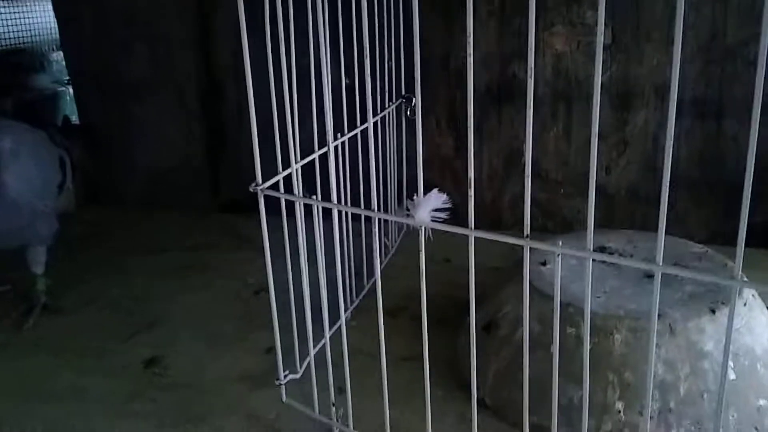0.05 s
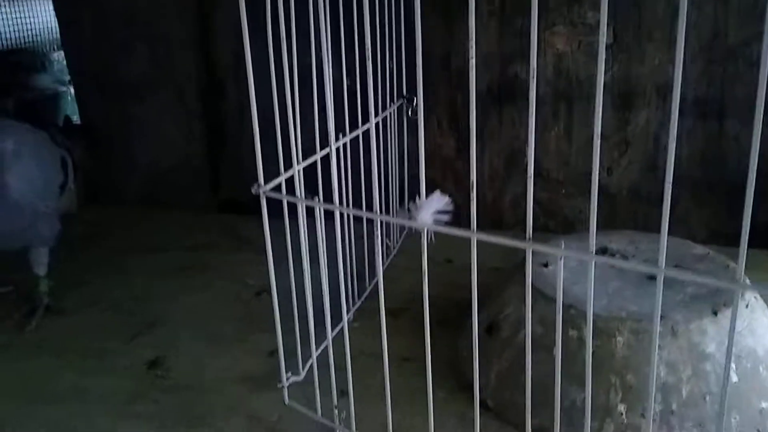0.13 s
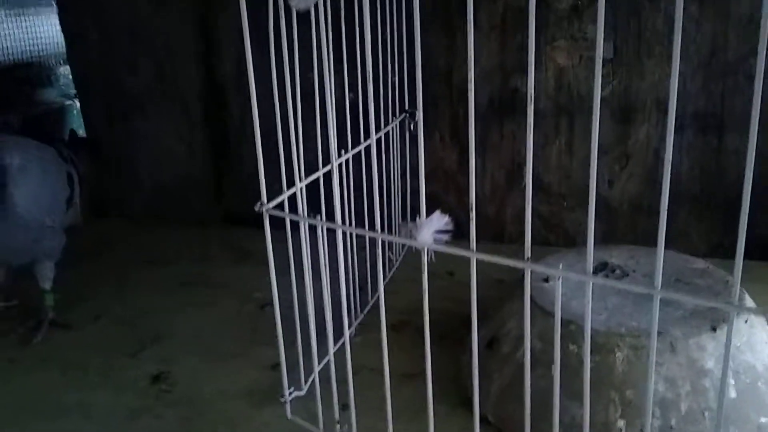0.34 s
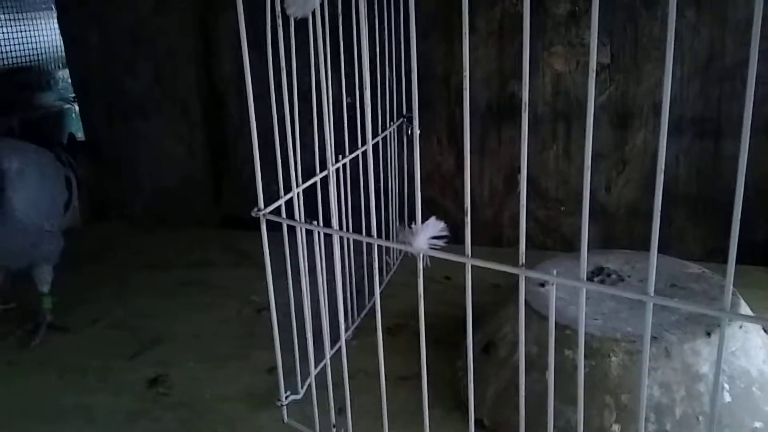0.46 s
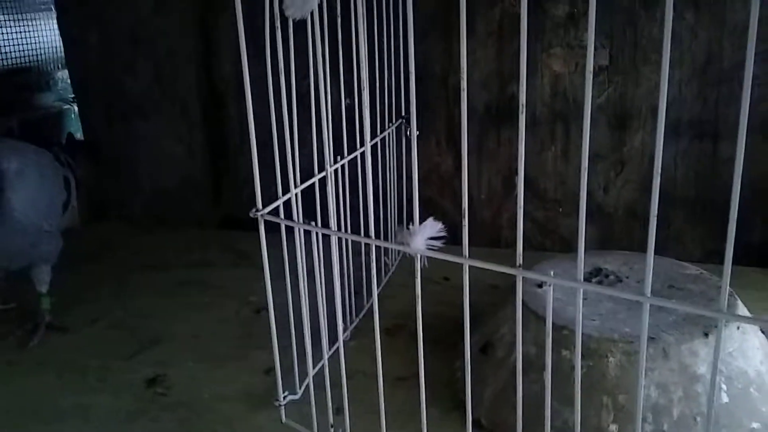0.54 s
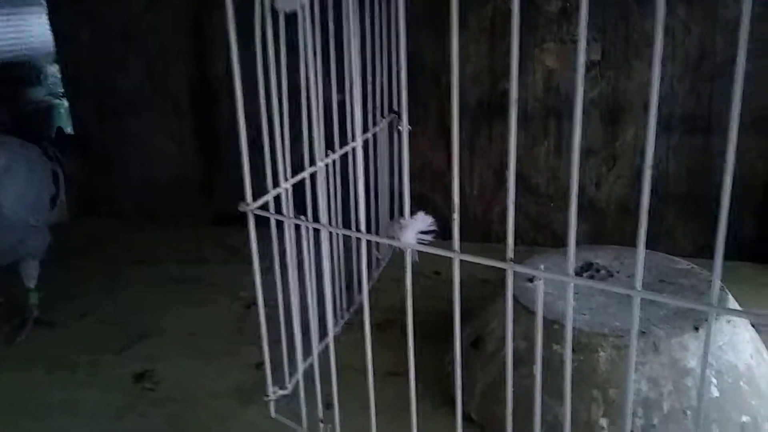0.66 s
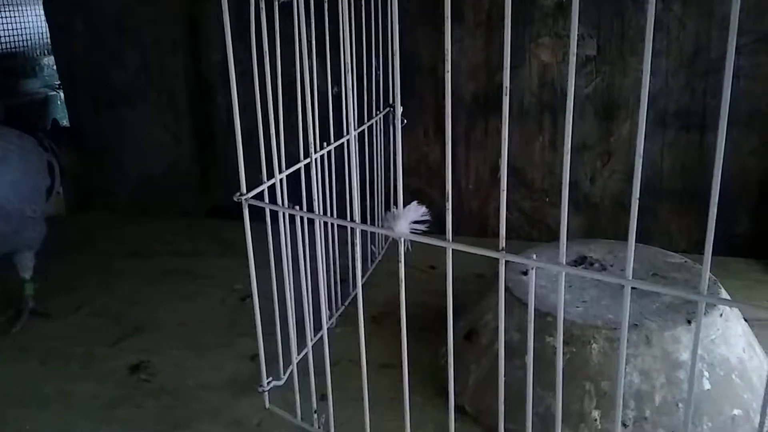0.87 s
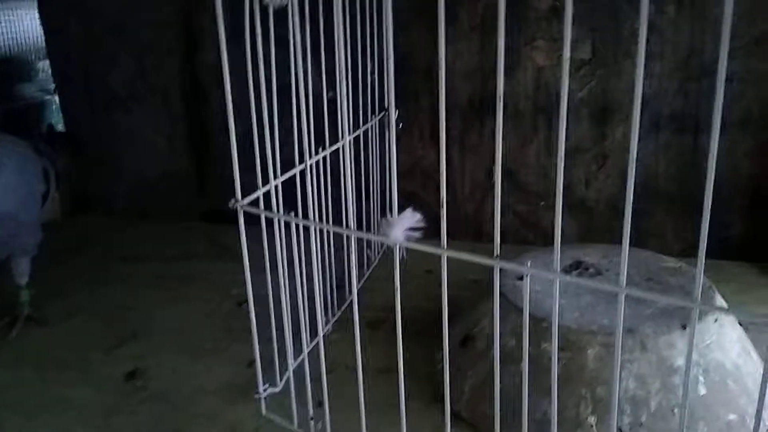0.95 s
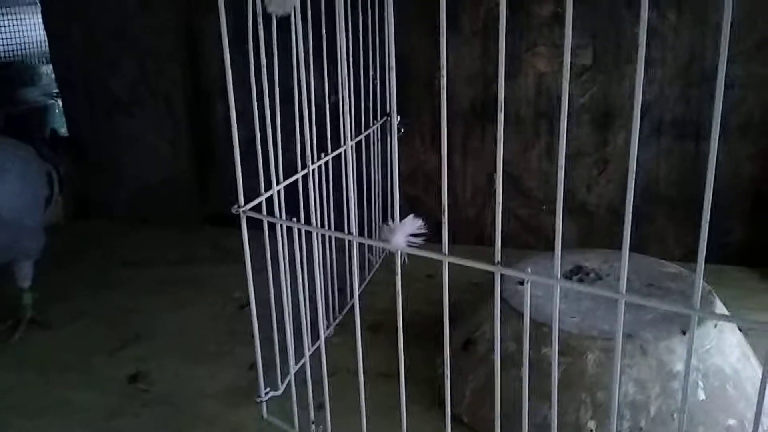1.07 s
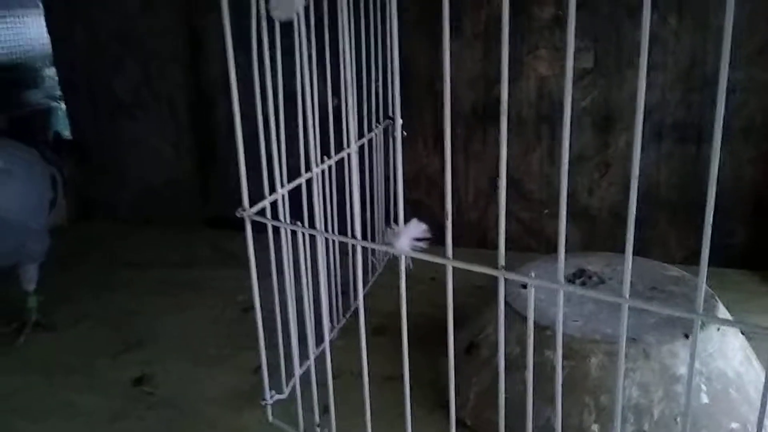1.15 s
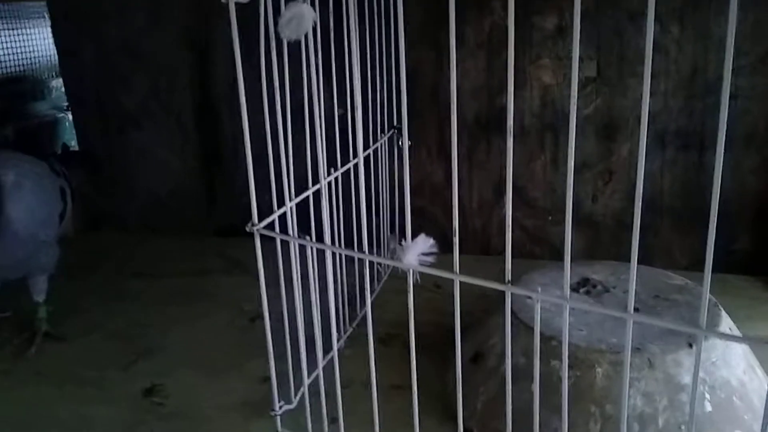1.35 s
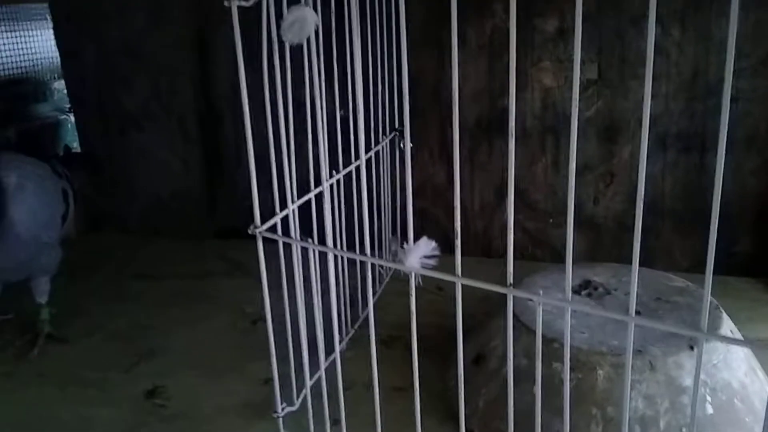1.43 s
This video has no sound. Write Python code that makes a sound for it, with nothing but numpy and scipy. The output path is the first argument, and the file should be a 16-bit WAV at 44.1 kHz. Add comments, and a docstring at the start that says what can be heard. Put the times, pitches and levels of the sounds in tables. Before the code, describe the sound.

One low, rolling pigeon coo sounds near the microphone inside a hollow wooden loft, swelling and then dropping away. A soft rush of wings follows, with light feather rustle, far birds murmuring and a faint rumble underneath.

```python
"""A pigeon coos low and rolling in a wooden loft: short lead-in, long swelling note, short tail note.
Its voice is a pulse train under a moving throat resonance, plus hoarse air; the loft's hollow boxes
ring at fixed low pitches. Feathers rustle and wings sweep nearby over a murmur of far birds and a rumble.
Above the bass, the two channels hear the room with opposite polarity and a small delay, combing their sum."""
import sys
import numpy as np
from scipy import signal
from scipy.fft import rfft, irfft, next_fast_len
from scipy.io import wavfile
from scipy.ndimage import uniform_filter1d, map_coordinates

SR = 44100
rng = np.random.default_rng(int(sys.argv[2]) if len(sys.argv) > 2 else 0)


def transcribe(signal):
    """Save signal, clipped to [-1, 1], as a 16-bit WAV file at the path in sys.argv[1]."""
    frames = np.atleast_2d(signal).T
    limited = np.clip(frames, -1, 1)
    pcm = np.round(limited * 32767).astype(np.int16)
    wavfile.write(sys.argv[1], SR, pcm)


N = 66150


def amp(db):
    return 10 ** (np.asarray(db) / 20)


def unit_rms(x):
    return x / np.sqrt(np.mean(x ** 2) + 1e-20)


def log_interp(points, hz):
    """(Hz, value) points read on a log axis."""
    knots_hz, values = np.transpose(points)
    return np.interp(np.log(hz + 1), np.log(knots_hz + 1), values)


def curves(rows):
    """Per-sample curve for each column after time."""
    times_s, *columns = np.transpose(rows)
    return [np.interp(np.arange(N) / SR, times_s, column) for column in columns]


def wobble(rate_hz):
    """Smooth random curve, rate_hz knots per second."""
    knots = rng.standard_normal(int(N * rate_hz / SR) + 4)
    return map_coordinates(knots, [np.arange(N) * rate_hz / SR])


def filtered(x, response):
    """Apply a complex frequency response."""
    size = next_fast_len(N + SR // 2)
    return irfft(rfft(x, size) * response(np.fft.rfftfreq(size, 1 / SR)), size)[..., :N]


# Bass phase between channels (frequency [Hz], phase [rad])
BASS_PHASE = [(20, -2.1), (120, -1.9), (200, -1.6), (300, -.8), (700, -1.1), (950, -.7)]
# Side signal tied to mid (frequency [Hz], share [0-1])
COHERENCE = [(30, .97), (130, .9), (220, .4), (700, .2), (1300, .45), (14000, .45)]
# Uncorrelated room noise (frequency [Hz], gain [dB])
DIFFUSE_SPECTRUM = [(100, -18), (200, -5), (700, -10), (1100, -30), (2000, -38), (2700, -36), (3300, -18),
                    (4500, -13), (7000, -3), (10000, -1), (12000, -6), (13500, -9)]
COMB_SPACING_HZ, COMB_FROM_HZ = 2240, 1130


def room_noise(spectrum, patchy_db):
    """Patchy stereo noise, rms 1, phase-shifted between the channels."""
    spectra = signal.stft(rng.standard_normal((4, N)), nperseg=512)[2]
    patches = rng.standard_normal(spectra.shape[1:])
    patches = uniform_filter1d(uniform_filter1d(patches, 6, axis=0), 10, axis=1)
    noise = signal.istft(spectra * amp(patchy_db * unit_rms(patches)), nperseg=512)[1][:, :N]

    def half_phase(hz):
        bass = log_interp(BASS_PHASE + [(COMB_FROM_HZ, 0)], hz)
        comb = 2 * np.pi * (COMB_FROM_HZ - hz) / COMB_SPACING_HZ
        return np.where(hz < COMB_FROM_HZ, bass, comb) / 2

    def side_response(hz):
        tied = log_interp(COHERENCE, hz)
        return -1j * np.sin(half_phase(hz)) * [tied, np.sqrt(1 - tied ** 2)]

    mid = filtered(noise[0], lambda hz: np.cos(half_phase(hz)))
    side = filtered(noise[:2], side_response).sum(0)
    diffuse = filtered(noise[2:], lambda hz: amp(log_interp(DIFFUSE_SPECTRUM, hz)))
    pair = np.array([mid + side, mid - side]) + diffuse
    return unit_rms(filtered(pair, lambda hz: amp(log_interp(spectrum, hz))))


# Rumble (frequency [Hz], gain [dB])
RUMBLE_SPECTRUM = [(15, -47.5), (30, -12), (60, 1.5), (110, 2.5), (180, -0.5), (260, -53.5)]


def rumble(level_db=-51):
    """Steady low noise."""
    return amp(level_db) * room_noise(RUMBLE_SPECTRUM, patchy_db=1)


# Hollow box modes (frequency [Hz], width [Hz])
BOX_MODES = [(215, 30), (260, 18), (296, 18), (327, 20), (342, 18), (380, 17), (409, 20), (449, 18),
             (481, 17), (545, 20), (589, 22)]
# Far birds (frequency [Hz], gain [dB])
MURMUR_SPECTRUM = [(120, -8), (220, -3.5), (420, -1), (600, -3), (800, -9), (1500, -20), (2500, -46.5),
                   (4000, -78.5)]
# Far birds (time [s], level [dB])
MURMUR_ENVELOPE = [(0, -40), (.1, -43), (.17, -44.5), (.6, -45), (1.0, -45), (1.2, -43.5), (1.36, -45.5),
                   (1.44, -50), (1.5, -49)]


def murmur(modes_db=3.5):
    """Far birds blur into low noise, coloured by the boxes."""
    def box_colour(hz):
        peaks = sum(width ** 2 / (width ** 2 + 4 * (hz - centre) ** 2) for centre, width in BOX_MODES)
        return 1 + amp(modes_db) * peaks

    coloured = filtered(room_noise(MURMUR_SPECTRUM, patchy_db=1.5), box_colour)
    return amp(curves(MURMUR_ENVELOPE)[0]) * unit_rms(coloured)


# Feather hiss (frequency [Hz], gain [dB])
FEATHER_SPECTRUM = [(500, -60), (900, -3), (1600, -1), (2400, 0), (2750, -4), (5000, -7), (6800, -11),
                    (9200, -10.5), (11500, -12), (12200, -14.5), (14200, -19)]
# Rustle (time [s], level [dB])
RUSTLE_ENVELOPE = [(0.0, -58), (0.078, -60), (0.154, -53.5), (0.5, -51), (0.518, -46.5), (0.784, -53),
                   (0.91, -61), (1.044, -57.5), (1.164, -59.5), (1.22, -56), (1.31, -55.5), (1.356, -53.5),
                   (1.458, -56), (1.5, -55.5)]


def feather_rustle():
    """Feathers hiss in slow swells."""
    level_db = curves(RUSTLE_ENVELOPE)[0] + 0.2 * wobble(23)
    return amp(level_db) * room_noise(FEATHER_SPECTRUM, patchy_db=2.5)


# Wing strokes (onset [s], hiss [dB], midrange [dB])
WING_STROKES = [(.13, -70, -64), (0.512, -51.5, -56), (0.772, -70.5, -77), (1.2, -53, -68),
                (1.337, -51.5, -68)]
# Stroke midrange (frequency [Hz], gain [dB])
STROKE_SPECTRUM = [(800, -23), (1150, -0.5), (1500, -4), (2000, -23)]


def wing_sweeps(rise_s=0.0044, hold_s=0.044, t60_s=0.13):
    """Each stroke is a quick burst of feather hiss and midrange noise."""
    t = np.arange(N) / SR
    hiss = room_noise(FEATHER_SPECTRUM, patchy_db=.5)
    body = room_noise([(500, -60), *STROKE_SPECTRUM, (3000, -60)], patchy_db=1.5)
    sweeps = np.zeros((2, N))
    for onset_s, hiss_db, body_db in WING_STROKES:
        rise = np.clip((t - onset_s) / rise_s, 0, 1)
        decay = amp(-60 * np.maximum(t - onset_s - hold_s, 0) / t60_s)
        sweeps += rise * decay * (amp(hiss_db) * hiss + amp(body_db) * body)
    return sweeps


# Wing rush (time [s], upper band [dB], lower band [dB])
WHOOSH_ENVELOPE = [(1.1, -88.5, -60), (1.2, -73, -52), (1.28, -53.5, -55.5), (1.36, -55.5, -51),
                   (1.42, -55.5, -49), (1.5, -88, -58.5)]
# Upper band (frequency [Hz], gain [dB])
WHOOSH_UPPER = [(1100, -30), (1500, -5), (1900, -2), (2350, 0), (2600, -15), (4000, -40)]
# Lower band (frequency [Hz], gain [dB])
WHOOSH_LOWER = [(450, -23), (700, -1), (1050, -3.5), (1400, -15), (1800, -35.5)]


def wing_whoosh():
    """One dull rush passes in two noise bands."""
    upper_db, lower_db = curves(WHOOSH_ENVELOPE)
    upper = amp(upper_db) * room_noise(WHOOSH_UPPER, patchy_db=.5)
    lower = amp(lower_db) * room_noise(WHOOSH_LOWER, patchy_db=.5)
    return upper + lower


# Gain per box mode (left [dB], right [dB])
BOX_GAINS = [(1.5, -18), (-6.5, -14.5), (3, -9), (-0.5, -1.5), (-11, -4.5), (-1, -3), (5.5, 5), (-1, 1.5),
             (2.5, -3), (-19, -12), (2, 4)]


def box_ring(source, direct_db=-9.5, phase_rad=0.59):
    """Direct sound plus ringing boxes, in a separate mix per channel."""
    signs = np.outer([1, -1], (-1) ** np.arange(len(BOX_MODES)))
    gains = amp(np.transpose(BOX_GAINS)) * np.exp(1j * phase_rad * signs)

    def response(hz):
        modes = [1j * hz * width / (centre ** 2 - hz ** 2 + 1j * hz * width)
                 for centre, width in BOX_MODES]
        return amp(direct_db) + gains @ np.array(modes)

    return filtered(source, response)


def throat_tone(pulse_hz, throat_hz, width_hz, jitter=.007, shimmer_db=1.5, wander_rad=.5, chirp_rad=1.3):
    """Harmonics of uneven pulses under a moving throat resonance."""
    harmonics = np.arange(1, 17)[:, None]
    pulse_phase = 2 * np.pi * np.cumsum(pulse_hz * (1 + jitter * wobble(15))) / SR
    weights = np.exp(-.5 * ((harmonics * pulse_hz - throat_hz) / width_hz) ** 2)
    flicker = amp(shimmer_db * np.array([wobble(13.8) for _ in harmonics]))
    wander = wander_rad * np.array([wobble(20) for _ in harmonics])
    chirp = chirp_rad * harmonics ** 2  # each pulse slides down in pitch
    partials = weights * flicker * np.cos(harmonics * pulse_phase + chirp + wander)
    return partials.sum(0) / np.sqrt((weights ** 2).sum(0) / 2 + 1e-9)


def noise_band(centre_hz, width_hz):
    """Gaussian band of noise, rms 1."""
    noise = rng.standard_normal(N)
    return unit_rms(filtered(noise, lambda hz: np.exp(-.5 * ((hz - centre_hz) / width_hz) ** 2)))


# Late-opening third resonance (time [s], level re tone [dB])
THIRD_ENVELOPE = [(.4, -22.5), (.8, -17.5), (.92, -8), (1.07, -5), (1.15, -4)]


def hoarse_air(throat_hz, second_db, breath_db=-10, breath_width_hz=70, top_db=-21):
    """Air noise in the moving throat resonance and three fixed ones."""
    carrier = 2 * np.pi * np.cumsum(throat_hz) / SR
    breath = wobble(2 * breath_width_hz) * np.cos(carrier) + wobble(2 * breath_width_hz) * np.sin(carrier)
    third = amp(curves(THIRD_ENVELOPE)[0]) * noise_band(centre_hz=484.6, width_hz=22)
    top = amp(top_db) * noise_band(centre_hz=583, width_hz=42)
    second = amp(second_db) * noise_band(centre_hz=408, width_hz=24.8)
    return amp(breath_db) * unit_rms(breath) + second + third + top


def voice(level_db, throat_hz, second_db, pulse_hz, width_hz, steady_s=.016):
    """Tone plus air at an even effort, shaped by the note's level."""
    mix = throat_tone(pulse_hz, throat_hz, width_hz) + hoarse_air(throat_hz, second_db)
    power = np.abs(uniform_filter1d(mix ** 2, int(steady_s * SR)))
    return amp(level_db) * mix / np.sqrt(power + .01)


def faded(rows, fade_s=.008, floor_db=-80):
    """Note rows with a fade at each end."""
    first, last = rows[0], rows[-1]
    return [(first[0] - fade_s, floor_db, *first[2:]), *rows, (last[0] + fade_s, floor_db, *last[2:])]


# Lead-in (time [s], level [dB], throat [Hz], second resonance [dB], pulse rate [Hz])
LEAD_NOTE = [(.185, -39, 350, -18, 124), (.2, -36, 300.3, -1.5, 125.4), (.23, -35, 324, 3.5, 141),
             (.26, -43.5, 442, 0, 154), (.3, -40.5, 515, -34, 149), (.32, -73, 490, -15, 140)]
# Swelling note (time [s], level [dB], throat [Hz], second resonance [dB])
LONG_NOTE = [(0.338, -43.5, 320.5, 19), (0.355, -37, 313, 2), (0.37, -26.5, 313.8, -1),
             (0.395, -31, 311.3, 2.5), (0.414, -32.5, 314.7, -10), (0.518, -33, 314, -6),
             (0.622, -28.5, 332.8, -9.5), (0.646, -28.5, 321.6, -27), (0.686, -32, 322, 3.5),
             (0.716, -27, 328.3, -7.5), (0.729, -42.5, 331, -2.5), (0.741, -25, 340, -4.5),
             (0.778, -30.5, 348.5, -3), (0.82, -26.5, 365.3, -5), (0.86, -23.5, 340.5, -12.5),
             (0.934, -26.5, 325, 0), (0.955, -30.5, 324.4, -4), (0.972, -27, 331.6, -2.5)]
# Tail (time [s], level [dB], throat [Hz], second resonance [dB])
TAIL_NOTE = [(1.0, -31, 333.7, 6.5), (1.016, -25.5, 321.6, -6), (1.045, -29, 330.6, -8),
             (1.065, -30, 349.2, -1.5), (1.098, -32, 366.5, 3), (1.15, -49.5, 357, -14),
             (1.17, -40.5, 336, -11)]
# Start of the next coo (time [s], level [dB], throat [Hz], second resonance [dB])
NEXT_COO = [(1.455, -55, 285, -12), (1.48, -44, 305, -12), (1.5, -42, 335, -10)]
# Roll after the lead-in (time [s], pulse rate [Hz])
ROLL_RATE = [(.35, 43), (.45, 42), (.6, 43), (.75, 42), (.82, 43), (.96, 42), (1.02, 43), (1.15, 41)]


def pigeon():
    """Three voiced notes; the next coo just sets in."""
    roll_hz = curves(ROLL_RATE)[0]
    lead = voice(*curves(faded(LEAD_NOTE)), width_hz=107)
    coo = voice(*curves(faded(LONG_NOTE) + faded(NEXT_COO)), roll_hz, width_hz=34.5)
    tail = voice(*curves(faded(TAIL_NOTE)), roll_hz, width_hz=60)
    return lead + coo + tail


def scene():
    return box_ring(pigeon()) + feather_rustle() + wing_sweeps() + wing_whoosh() + murmur() + rumble()


CUTOFF_HZ = 14250


def record(dry):
    """Brick-wall low-pass."""
    return filtered(dry, lambda hz: hz < CUTOFF_HZ)


dry = scene()
out = record(dry)
transcribe(out)
```